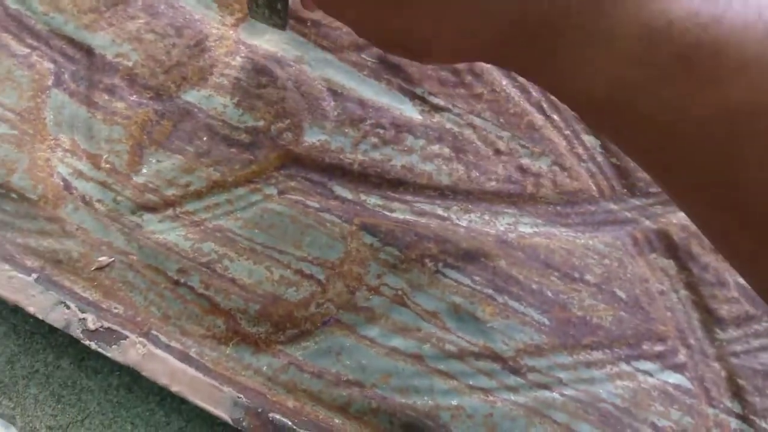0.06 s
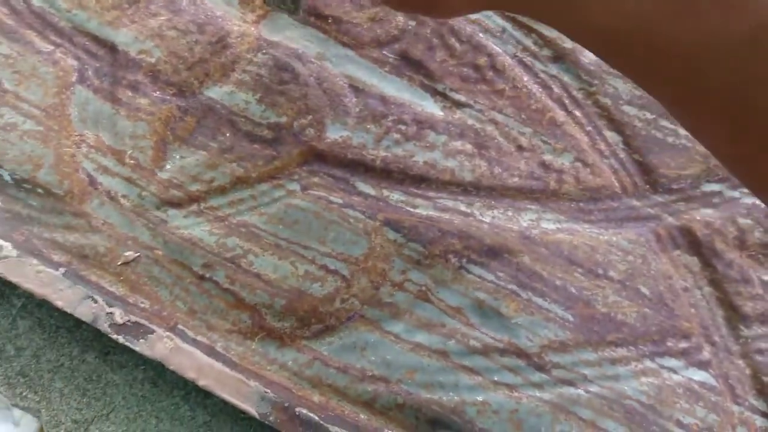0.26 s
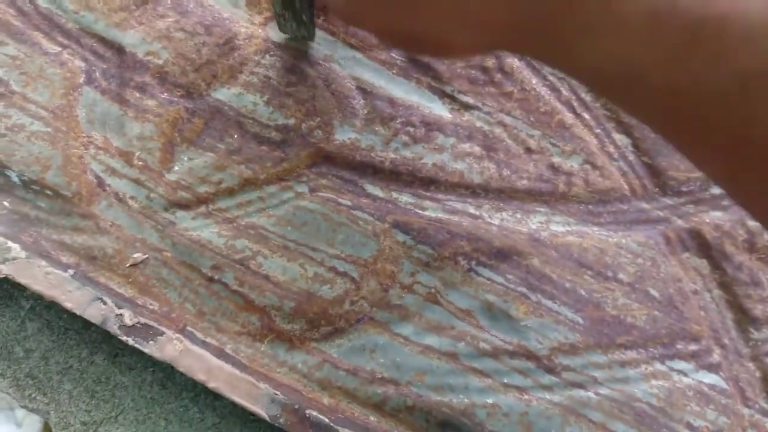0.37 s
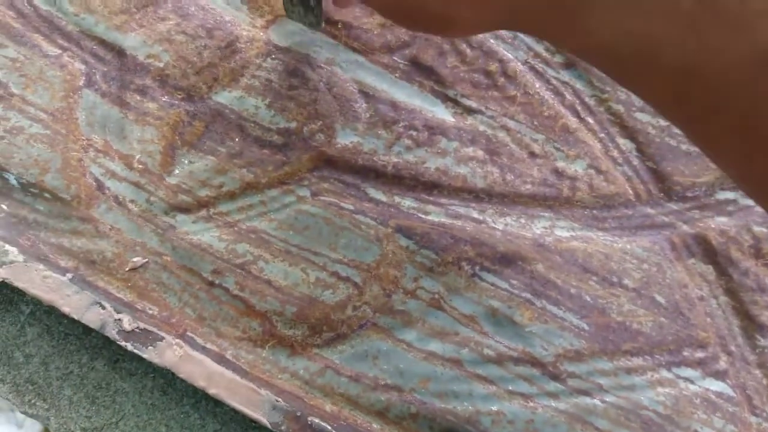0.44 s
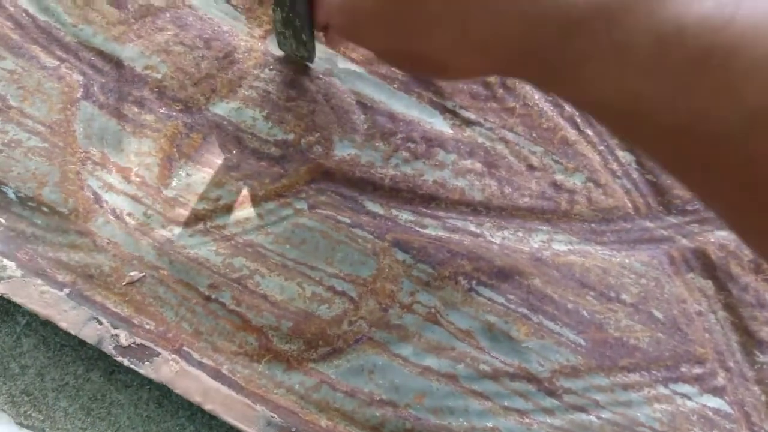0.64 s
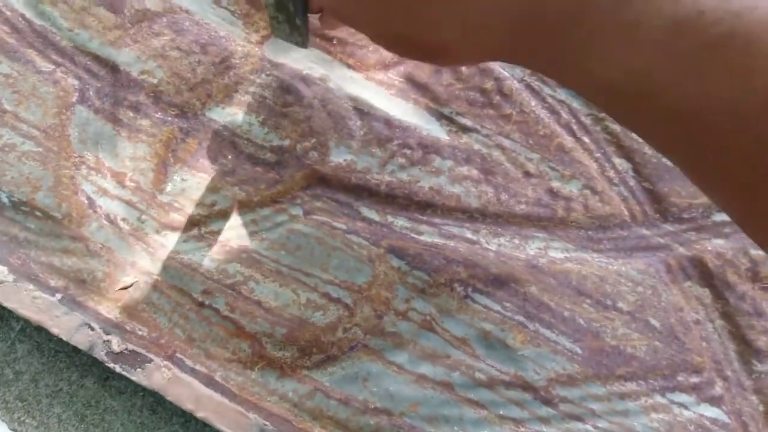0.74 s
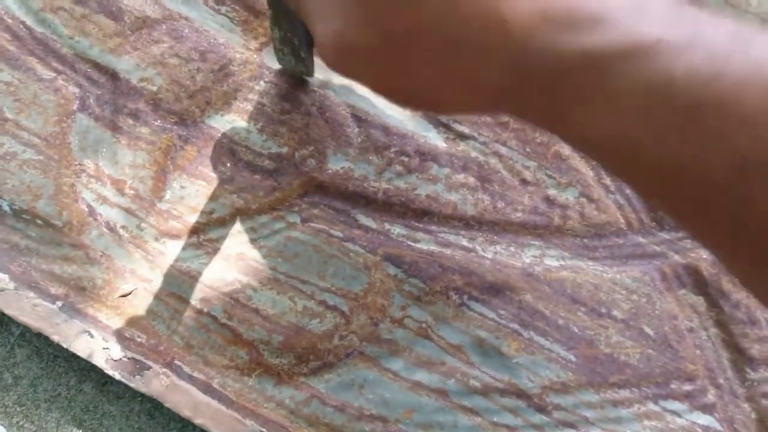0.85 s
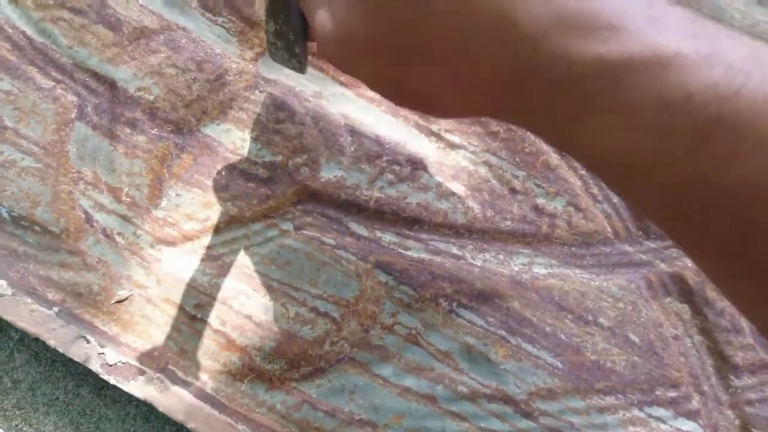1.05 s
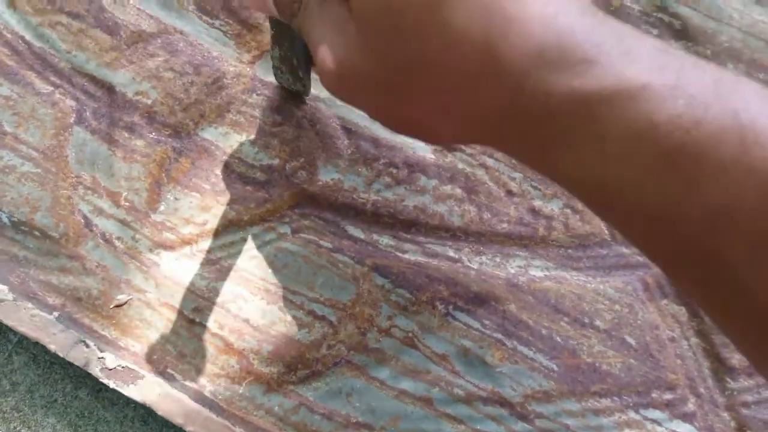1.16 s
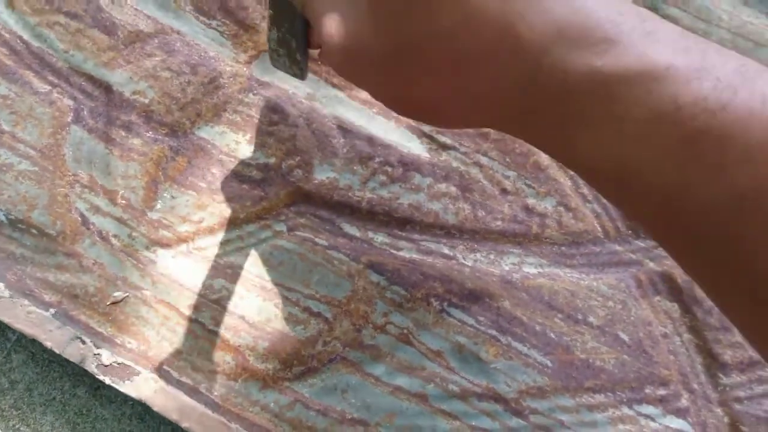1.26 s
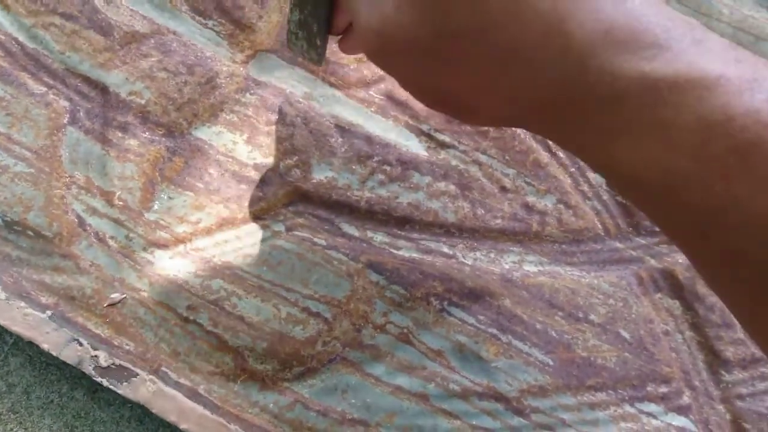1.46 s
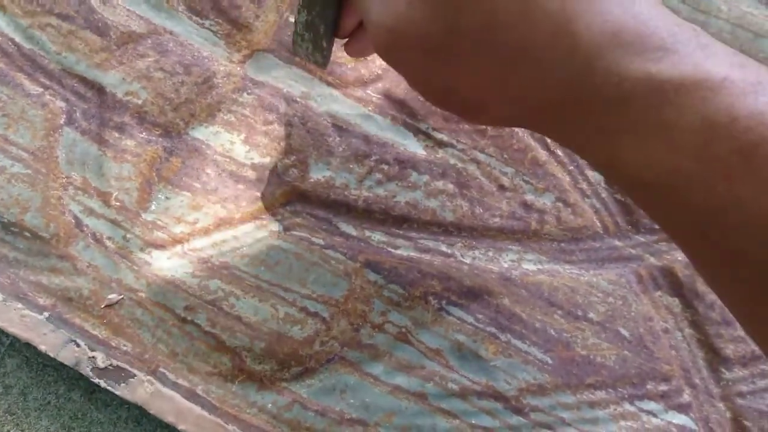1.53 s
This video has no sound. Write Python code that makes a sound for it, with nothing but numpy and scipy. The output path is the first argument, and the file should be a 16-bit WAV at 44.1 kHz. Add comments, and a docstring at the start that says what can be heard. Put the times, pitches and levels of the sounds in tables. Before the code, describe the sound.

A hammer drives a chisel under old paint in five quick, even blows. Each cracks sharply and makes the panel boom hollowly, while the chisel rattles, scrapes and snaps off flakes. Light clacks follow, close up in a quiet room.

```python
"""Chiselling off old paint

A hammer drives a chisel under old paint on a large, well-damped panel: five blows, four a second,
in a quiet room. Each impact cracks and excites the modes of the panel, which booms and knocks.
The loose chisel rebounds, clacks and chatters; its blade crunches on by stick-slip friction,
and flakes snap off. Between blows the tool settles with light clacks."""
import sys
import numpy as np
from scipy import signal
from scipy.fft import rfft, irfft
from scipy.io import wavfile
from scipy.ndimage import uniform_filter1d

SR = 44100
rng = np.random.default_rng(int(sys.argv[2]) if len(sys.argv) > 2 else 0)


def to_wav(sig):
    """Store sig (one row per channel, or 1-D mono) as 16-bit WAV at the path in sys.argv[1].

    Samples outside -1..1 are clipped; the rate is SR.
    """
    pcm = np.clip(np.atleast_2d(sig), -1, 1) * 32767
    pcm = np.round(pcm).astype(np.int16)
    wavfile.write(sys.argv[1], SR, pcm.T)  # frames by channels


N = 70560
T = np.arange(N) / SR
BIN_HZ = np.arange(N // 2 + 1) * SR / N


def from_db(db):
    """Amplitude ratio of a level."""
    return 10 ** (np.asarray(db) / 20)


def rms_one(x):
    """Normalisation to unit rms."""
    return x / np.sqrt(np.mean(x ** 2) + 1e-20)


def at_hz(points, hz, column=1):
    """Interpolation of a spectrum table in log frequency."""
    points = np.array(points)
    return np.interp(np.log(hz + 1), np.log(points[:, 0]), points[:, column])


def convolve(x, response):
    """Output of a linear system with this impulse response."""
    return signal.fftconvolve(x, response)[:N]


def excite(hits, response):
    """Superposition: one scaled, delayed response for each (t/s, level/dB)."""
    impulses = np.zeros(N)
    for t, db in hits:
        impulses[int(t * SR)] += from_db(db)
    return convolve(impulses, response)


def low_pass(x, hz):
    """Fourth-order roll-off above hz."""
    return signal.sosfilt(signal.butter(4, hz, fs=SR, output="sos"), x)


def click_of(spectrum):
    """Minimum phase: the sharpest causal click with this spectrum; peak 1."""
    cepstrum = irfft(np.log(from_db(at_hz(spectrum, BIN_HZ))))
    causal = 2 * cepstrum * (np.arange(N) < N // 2)
    click = irfft(np.exp(rfft(causal)))
    return click / np.abs(click).max()


def noise_of(spectrum):
    """Stationary noise with this spectrum; rms 1."""
    return rms_one(irfft(rfft(rng.standard_normal(N)) * from_db(at_hz(spectrum, BIN_HZ))))


def decay(t60):
    """Exponential damping: 60 dB lost in t60."""
    return from_db(-60 * T / t60)


def ringing(modes, spread_db=0):
    """Free vibration as damped sines; spread_db varies their strengths, as the contact point does."""
    return sum(from_db(db + spread_db * rng.standard_normal()) * decay(t60) * np.sin(2 * np.pi * hz * T)
               for hz, db, t60 in modes)


# room tone spectrum: f/Hz, relative level/dB
ROOM_SPECTRUM = [(25, -34), (60, -1.5), (130, 0.5), (250, -5.5), (450, -19), (1000, -34), (2500, -27.5),
                 (6200, -33.5), (7800, -49), (12000, -53), (16000, -67)]
# panel rumble spectrum: f/Hz, relative level/dB
RUMBLE_SPECTRUM = [(30, -76), (60, -10), (115, 29.5), (180, 21), (280, 15), (400, 9), (600, -1.5),
                   (1000, 7.5), (1800, 1.5), (3500, -53)]
# rumble under the leaning hand: t/s, level/dB
RUMBLE_LEVELS = [(.22, -79), (.3, -49.5), (.7, -52.5), (.92, -53.5), (1.15, -53.5), (1.42, -49.5),
                 (1.52, -48), (1.6, -51)]
def background(room_db=-63):
    """Random vibration: steady room tone, and the panel rumbling under the hand."""
    room = from_db(room_db) * noise_of(ROOM_SPECTRUM)
    leaning = from_db(np.interp(T, *np.transpose(RUMBLE_LEVELS)))
    return room + leaning * noise_of(RUMBLE_SPECTRUM)


# the hand shifts its weight: t/s, level/dB
BUMPS = [(.008, -44.5), (.115, -51.5), (.928, -39)]
def bumps(hz=82.7, length_s=0.015):
    """A soft push on the panel carries only low frequencies: one short, rounded swing."""
    window = np.sin(np.pi * np.minimum(T / length_s, 1))
    return excite(BUMPS, np.sin(2 * np.pi * hz * T) * window)


def crack(t, db, top_hz, spray_db, t60):
    """A brief contact has a broad spectrum: an impulse with a quick spray of splinters."""
    burst = from_db(spray_db) * rng.standard_normal(N) * decay(t60) - (T == 0)
    return excite([(t, db)], low_pass(burst, top_hz))


# hammer blows: t/s, crack level/dB, crack cutoff f/Hz, then level/dB of chisel, wash, boom, knock
BLOWS = [(0.238, -28, 15000, -21, -29, -36, -46), (.4910, -21, 16000, -19.5, -30, -36.5, -32),
         (0.7526, -23, 16000, -20, -31, -34, -35), (0.9902, -23, 12700, -20.5, -31, -36.5, -31),
         (1.2449, -20.5, 8600, -46, -32.5, -36.5, -34)]
# spectrum of a hard contact: f/Hz, relative level/dB
CRACK_SPECTRUM = [(100, 3), (330, 5), (590, -4.5), (820, 10.5), (1900, 10), (2800, 5.5), (4000, -3),
                  (6100, 0.5), (7400, -23), (10500, -15), (16000, -35)]
def hammer():
    """Impact noise: each blow opens with a bright crack."""
    cracks = sum(crack(t, db, top_hz, spray_db=-14, t60=0.042) for t, db, top_hz, *_ in BLOWS)
    return convolve(cracks, click_of(CRACK_SPECTRUM))


# the chisel rebounds and rattles: t/s, level/dB
CLACKS = [(0.2486, -24.5), (0.2601, -33), (0.3057, -26.5), (0.3152, -30.5), (0.3286, -29.5), (0.3373, -32),
          (0.3632, -34.5), (0.3762, -42), (0.388, -44), (0.4067, -42.5), (0.4185, -42.5), (.502, -21.5),
          (0.5518, -23.5), (0.5636, -27), (0.5728, -28), (0.6126, -42), (0.617, -44), (0.6342, -39),
          (0.643, -32.5), (0.6847, -44.5), (0.7376, -33), (0.7636, -21.5), (0.7781, -29), (0.8174, -40),
          (0.8254, -30), (0.843, -55), (.8780, -36.5), (.8897, -45), (0.965, -42), (1.003, -30.5),
          (1.036, -34), (1.057, -32.5), (1.0648, -30), (1.1878, -42), (1.3614, -42.5), (1.442, -42),
          (1.4516, -42), (1.4605, -34.5), (1.4992, -36.5), (1.5304, -38.5)]
# chisel modes: f/Hz, relative level/dB, T60/s
CHISEL_MODES = [(1245, -13, 0.031), (1676, 2.5, 0.013), (1828, -1.5, 0.012), (2440, -15.5, 0.019),
                (3927, -24.5, 0.031), (6010, -26, 0.019)]
def chisel(contact_s=0.00045, detune=0.027, grit_db=-43):
    """Hand-damped modes clack drily, at a slightly different pitch each time, with a puff of grit."""
    blows = [(t, chisel_db) for t, _, _, chisel_db, *_ in BLOWS]
    clacks, grit = 0, 0
    for hit in blows + list(CLACKS):
        modes = [(hz * (1 + detune * rng.standard_normal()), db, t60) for hz, db, t60 in CHISEL_MODES]
        clack = ringing(modes, spread_db=2.5) * (1 - np.exp(-T / contact_s))
        clacks += excite([hit], clack / np.abs(clack).max())
        grit += excite([hit], rng.standard_normal(N) * decay(t60=0.06))
    grit = low_pass(convolve(grit, click_of(CRACK_SPECTRUM)), hz=10500)
    return clacks + from_db(grit_db) * grit


# dense modes of panel and room: f/Hz, relative level per hertz/dB, T60/s
WASH_SPECTRUM = [(35.4, -16, .7), (65.7, -11.5, 1), (108, -1.5, 0.5), (195, 2.5, 0.89), (310, 1.5, 0.5),
                 (435, -5.5, 0.68), (595, -15, 0.93), (836, -1.5, 0.4), (1135, -2, 0.3), (1420, -4.5, 0.48),
                 (1900, -6.5, 0.33), (2840, -9, 0.18), (3830, -15.5, 0.16), (5373, -9, 0.059),
                 (6920, -30.5, 0.064), (15000, -36, 0.032)]
def wash(rise_cycles=0.32):
    """Modal overlap: close modes merge into third-octave noise; the lows swell later and last longer."""
    edges = 30 * 2 ** (np.arange(28) / 3)
    white = rng.standard_normal((2, N))
    out, power = 0, 0
    for k, (low, high) in enumerate(zip(edges, edges[1:])):
        hz = np.sqrt(low * high)
        band_pass = signal.butter(2, [low, high], "band", fs=SR, output="sos")
        band = signal.sosfilt(band_pass, white[k % 2])[::-1]  # reversed, to start at full strength
        local_power = uniform_filter1d(band ** 2, size=int(2 * SR / (high - low)))
        steady = band / np.sqrt(local_power + 1e-12)
        gain = from_db(at_hz(WASH_SPECTRUM, hz)) * np.sqrt(high - low)
        envelope = decay(at_hz(WASH_SPECTRUM, hz, column=2)) * (1 - np.exp(-T * hz / rise_cycles))
        out += gain * steady * envelope
        power += gain ** 2
    return out / np.sqrt(power)


# panel modes: f/Hz, relative level/dB, T60/s
PANEL_MODES = [(64.1, -14, 0.95), (106.1, 3.5, 0.24), (113.8, -5, 0.31), (163.9, -6.5, 0.38),
               (243, -4.5, 0.61), (255.6, 1, 0.26), (280.3, -4.5, 0.54), (361, -14.5, 0.76),
               (464, -12.5, 0.67), (758.5, -10, 0.4), (910, 4.5, 0.088), (981.5, 1, 0.12), (1083, -3, 0.29)]
def panel(split_hz=600, boom_rise_s=0.0067, knock_rise_s=0.0066):
    """Modal response: low modes boom and high ones knock, strongly at blows and softly at clacks."""
    clack_to_modes_db, clack_to_wash_db = -22.5, -26.5
    boom = ringing([mode for mode in PANEL_MODES if mode[0] < split_hz])
    boom *= 1 - np.exp(-T / boom_rise_s)
    knock = ringing([mode for mode in PANEL_MODES if mode[0] >= split_hz])
    knock *= 1 - np.exp(-(T / knock_rise_s) ** 2)
    out = from_db(clack_to_modes_db) * excite(CLACKS, boom + knock)
    ends = [blow[0] for blow in BLOWS[1:]] + [np.inf]
    for (t, *_, wash_db, boom_db, knock_db), end in zip(BLOWS, ends):
        rebounds = [(at, db + clack_to_wash_db) for at, db in CLACKS if t <= at < end]
        out += excite([(t, wash_db)] + rebounds, wash())  # same spot, same response
        out += excite([(t, boom_db)], boom) + excite([(t, knock_db)], knock)
    return out


def hollow(x, hz=610, width_hz=127, dip_db=-6):
    """Notch filtering: a narrow dip near 610 Hz makes all the hammering and scraping sound hollow."""
    notched = signal.lfilter(*signal.iirnotch(hz, hz / width_hz, fs=SR), x)
    return notched + from_db(dip_db) * (x - notched)


# echoes from nearby surfaces: delay t/s, level/dB
ECHOES = [(.0048, -9), (.0098, -14.5), (.0142, -11)]
def reflected(x):
    """Early reflections repeat each contact within milliseconds."""
    return x + excite(ECHOES, x)


# the blade advances through paint: t/s, duration/s, level/dB
SCRAPES = [(0.256, 0.06, -35), (0.33, 0.078, -44), (0.789, 0.027, -36), (1.083, 0.039, -43.5),
           (1.299, 0.014, -42.5), (1.344, 0.0081, -50), (1.590, 0.0079, -45)]
# spectrum of crumbling paint: f/Hz, relative level/dB
PAINT_SPECTRUM = [(200, -11), (600, 12.5), (2000, 6.5), (3000, 8), (3900, -2.5), (6300, -10), (7600, -31),
                  (12000, -30.5), (16000, -61)]
def scraping(grains_per_s=2100, spread_db=3, slips_per_s=100, dip_db=11, rise_s=0.0013, fall_s=0.018):
    """Stick-slip friction: dense grains of crumbling paint surge at each uneven slip of the blade."""
    sizes = from_db(spread_db * np.minimum(rng.exponential(1, N), 3)) * rng.choice([-1, 1], N)
    slip_times = np.cumsum(rng.uniform(0.5, 1.5, size=400)) / slips_per_s
    slip_phase = np.interp(T, slip_times, np.arange(len(slip_times))) % 1
    judder = from_db(-dip_db * slip_phase)
    breaks = rng.random(N) < grains_per_s / SR
    grains = rms_one(convolve(sizes * judder * breaks, click_of(PAINT_SPECTRUM)))
    strokes = sum(from_db(db) * np.interp(T - t, [0, rise_s, span, span + fall_s], [0.003, 0.9, 0.25, 0])
                  for t, span, db in SCRAPES)
    return grains * strokes


# a flake snaps off: t/s, level/dB
SNAPS = [(0.2726, -34), (0.3, -33), (0.5139, -28), (0.7992, -30), (1.294, -29.5)]
def flakes():
    """Brittle fracture: each flake gives a shorter, duller crack than a blow."""
    cracks = sum(crack(t, db, top_hz=4300, spray_db=-7.5, t60=0.02) for t, db in SNAPS)
    return convolve(cracks, click_of(CRACK_SPECTRUM))


def scene():
    """Sound pressures add at one close microphone."""
    work = panel() + reflected(chisel() + hammer() + flakes()) + scraping()
    return (hollow(work) + bumps() + background())[None]


def record(dry, low_hz=48, high_hz=16300):
    """Band limiting: the microphone drops the deep bass, and the top is cut steeply."""
    thin = signal.sosfilt(signal.butter(3, low_hz, "high", fs=SR, output="sos"), dry)
    return signal.sosfilt(signal.ellip(10, 0.2, 70, high_hz, fs=SR, output="sos"), thin)


dry = scene()
out = record(dry)
to_wav(out)
```